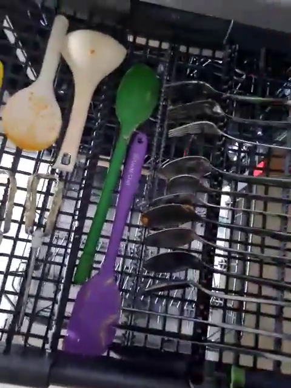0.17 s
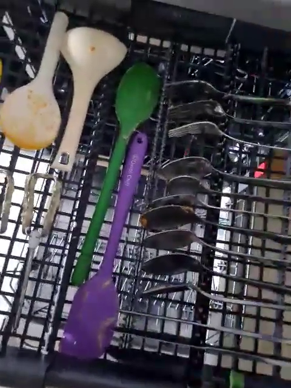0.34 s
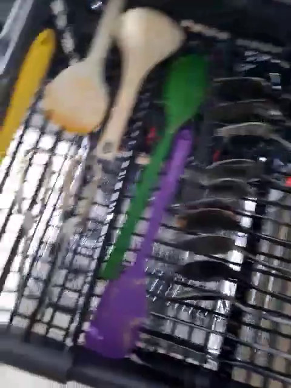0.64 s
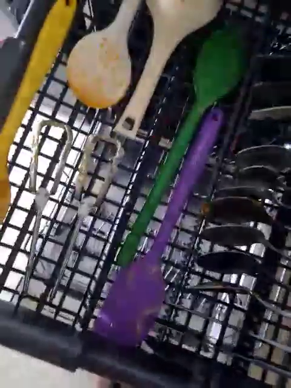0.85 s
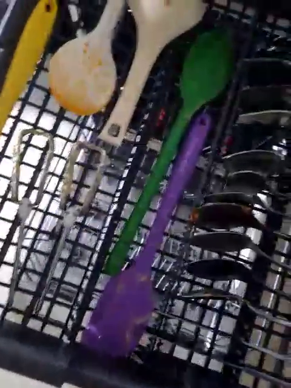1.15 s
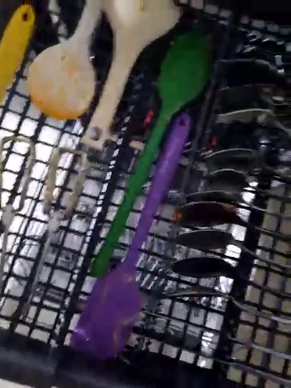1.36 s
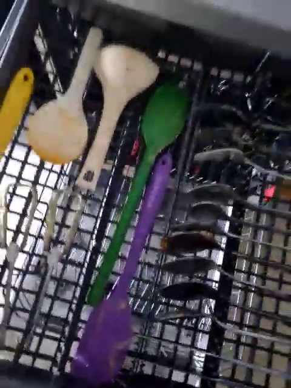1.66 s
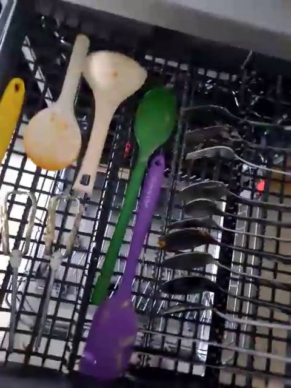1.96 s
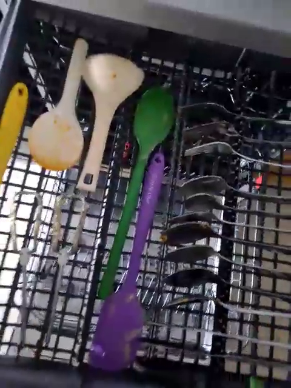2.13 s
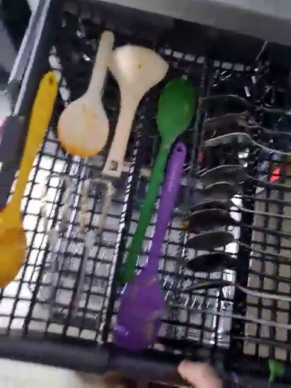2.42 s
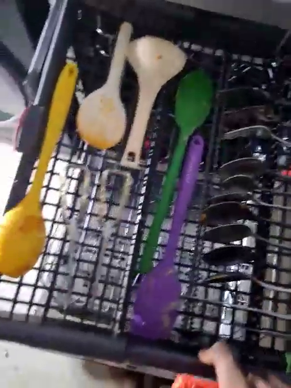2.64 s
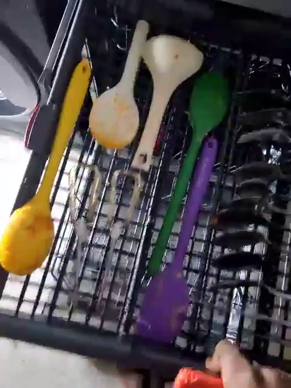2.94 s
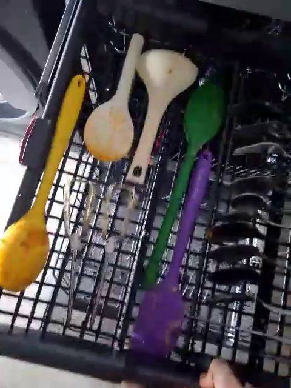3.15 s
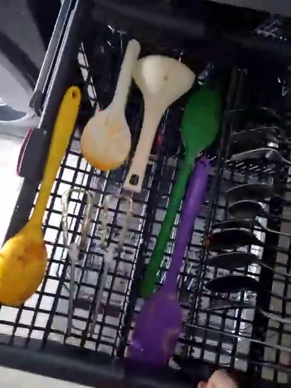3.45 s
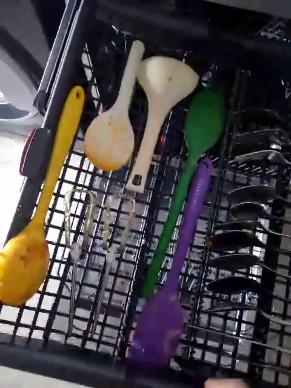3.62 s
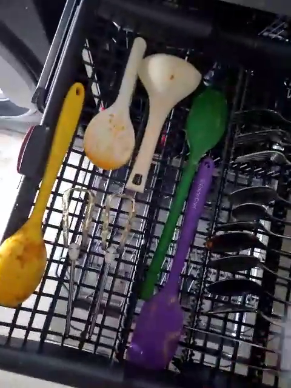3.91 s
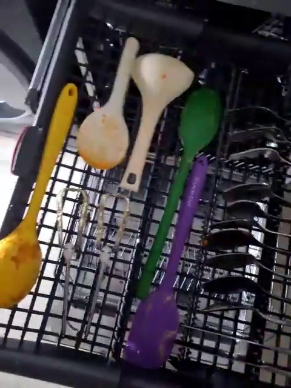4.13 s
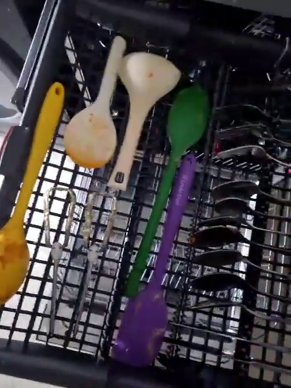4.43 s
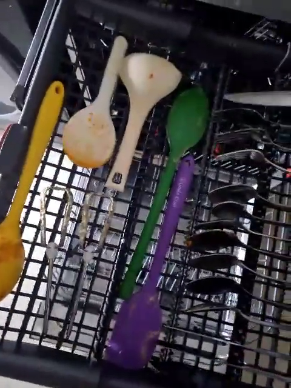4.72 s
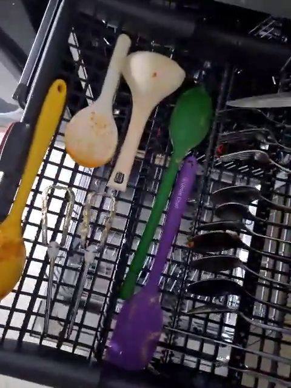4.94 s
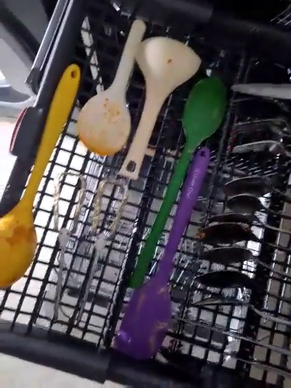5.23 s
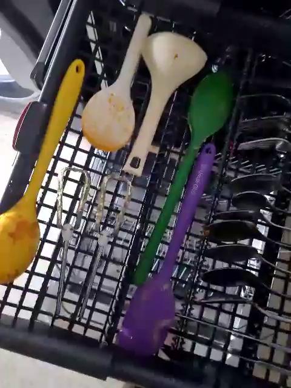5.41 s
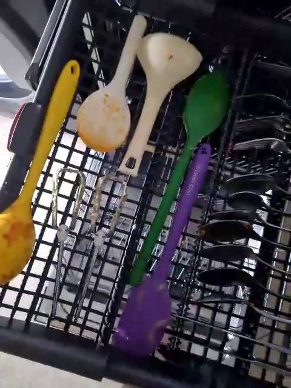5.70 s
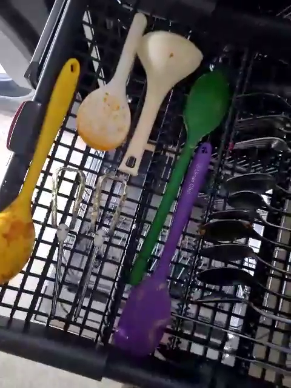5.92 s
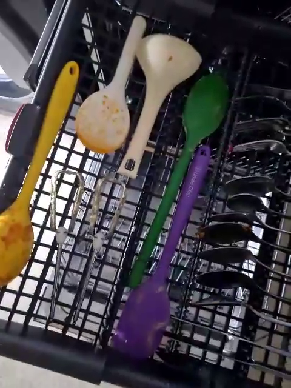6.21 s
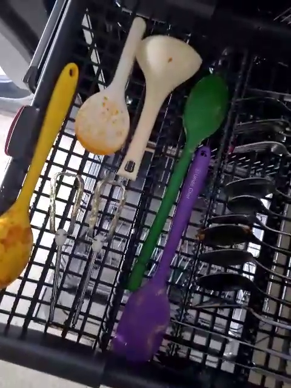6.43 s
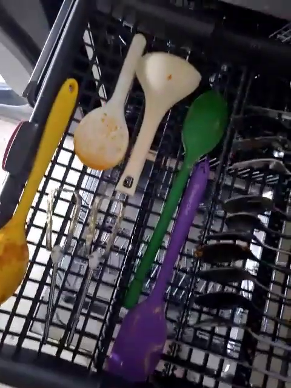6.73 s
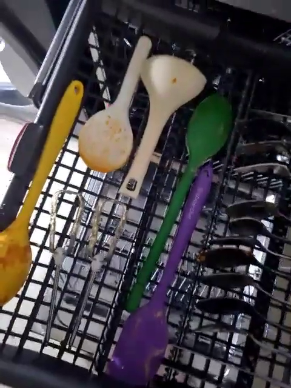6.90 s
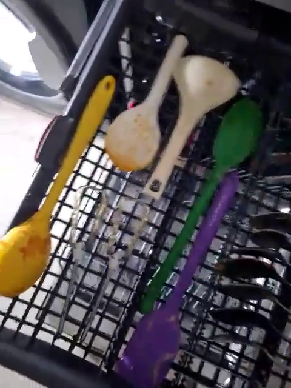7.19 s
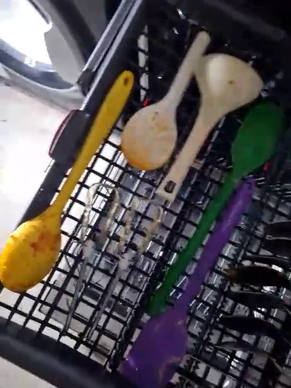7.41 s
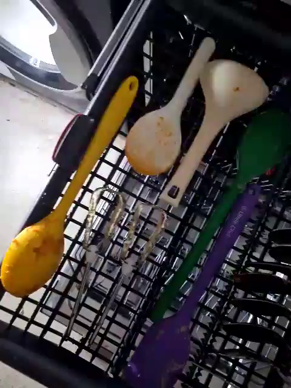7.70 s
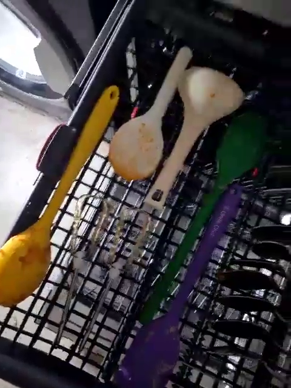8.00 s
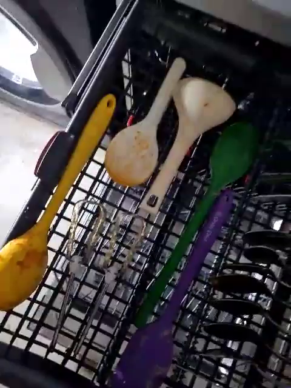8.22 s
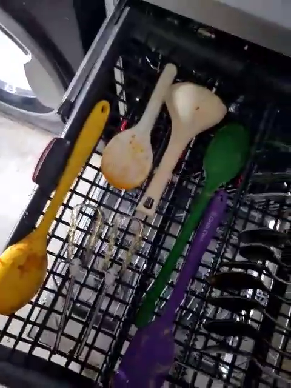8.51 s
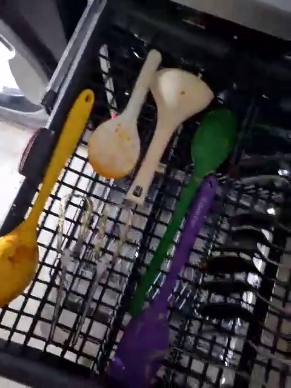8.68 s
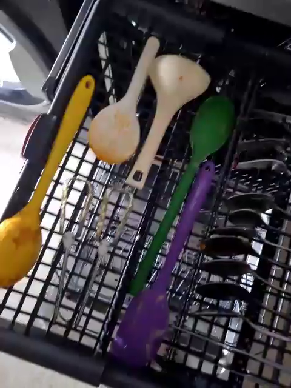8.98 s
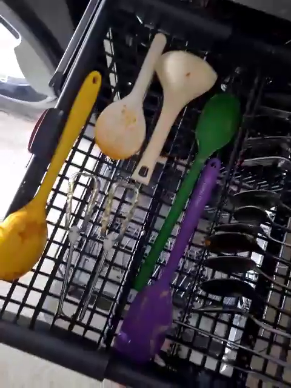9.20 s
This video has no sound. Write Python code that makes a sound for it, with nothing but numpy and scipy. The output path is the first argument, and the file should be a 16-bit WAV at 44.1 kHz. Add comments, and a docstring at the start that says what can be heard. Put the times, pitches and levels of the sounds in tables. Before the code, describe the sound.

A soft appliance drone with a low hum runs throughout, a little stronger at first. From the start, a dishwasher's plastic cutlery tray rolls on its rails, bumps at about 0.4 seconds and comes to rest before 1 second. A quick cluster of knocks and rattles follows around 1 second as cutlery meets the plastic grid, then a few faint ticks. A firm double knock lands at 3.3 seconds. From 4.4 to 6 seconds comes a string of dull knocks and short rattles, with a thin, high ring from a steel blade near 4.9 seconds. Hands rustle faintly in between. After a lull, the busiest clatter runs from 7.4 to 7.9 seconds, with a spoon chiming brightly twice inside it. A few light taps between 8.9 and 9.3 seconds end the scene. Everything sounds close, and the kitchen adds a short echo to each blow.

```python
"""Over a soft appliance drone, the plastic cutlery tray of an open dishwasher rolls out on its rails
and comes to rest within a second. Spoons and knives are then laid into its grid: dull knocks and
short rattles, with hands rustling in between. Near 5 s one steel blade rings; near 7.5 s a spoon
chimes in a burst of clatter, and a few light taps end the scene. The kitchen answers each blow."""
import sys
import numpy as np
from scipy import signal
from scipy.io import wavfile

SR = 44100
rng = np.random.default_rng(int(sys.argv[2]) if len(sys.argv) > 2 else 0)


def bounce(signal):
    """Save signal as a 16-bit WAV file at the path given by the first command-line argument."""
    frames = np.transpose(np.atleast_2d(signal))
    limited = np.clip(frames, -1, 1)
    pcm = np.round(limited * 32767).astype(np.int16)
    wavfile.write(sys.argv[1], SR, pcm)


N = 412335

# swell of the appliance drone: t/s, level/dB
DRONE_LEVEL = [(0, -55), (.6, -62.5), (1.5, -63.5), (2.0, -68.5), (2.5, -71.5), (3.1, -67), (3.7, -73),
               (4.2, -76.5), (4.8, -72), (5.6, -74), (6.3, -78), (6.9, -77), (7.1, -72.5), (8.2, -79.5),
               (8.8, -78), (9.35, -70)]
# noise colours of rumble, drone, rustle (also the hiss) and wheels: f/Hz, density/dB
RUMBLE_COLOUR = [(12, -62), (20, -44.5), (42, -11), (64, -2.5), (101, -9), (133, -13.5), (162, -12.5),
                 (270, -12), (359, -20), (600, -25.5), (780, -54), (1320, -120)]
DRONE_COLOUR = [(300, -22), (470, -7), (650, -1.5), (900, 4), (1400, -1.5), (1900, 0.5), (2300, -31),
                (2800, -20)]
RUSTLE_COLOUR = [(1290, -31.5), (2200, -17), (2550, -9.5), (2900, 4), (3890, 1), (4870, -0.5), (6630, -2.5),
                 (12500, -9.5), (15000, -14.5)]
WHEEL_COLOUR = [(30, -52.5), (60, -15), (90, -14.5), (280, -12.5), (640, -15.5), (1000, -18), (2000, -22.5),
                (3300, -19.5), (5000, -27), (12000, -60)]
# resonances of the cabinet, the rails and the plastic tray: f/Hz, width/Hz, gain/dB
CABINET_MODES = [(1430, 430, 0), (3450, 60, 7), (4500, 83, -4)]
RAIL_MODES = [(92, 15, 10), (280, 18, 17), (490, 30, 8), (641, 16, 16), (1290, 80, 9), (1670, 60, 6),
              (2220, 25, 13), (2620, 60, 8), (3290, 60, 6)]
TRAY_MODES = [(288.4, 24, -1), (469, 21, -5.5), (660, 36, -19), (1009, 17, -8), (1494, 130, -9.5),
              (3287, 540, 0), (4650, 800, -10.5)]
# moves of hands and cloth: start/s, end/s, level/dB
HAND_MOVES = [(0.676, 0.888, -68), (2.878, 3.19, -68.5), (3.6, 3.677, -75), (4.704, 4.897, -70),
              (5.658, 5.74, -83), (7.135, 7.437, -69), (9.24, 9.411, -76.5)]
# decay of the kitchen: f/Hz, t60/s
KITCHEN_DECAY = [(80, 1), (260, .5), (700, 0.43), (1840, 0.33), (4850, 0.44), (12800, 0.37)]
# the tray's run along its rails: t/s, level/dB
ROLL_LEVEL = [(0.0, -45), (0.196, -44.5), (0.376, -46), (0.438, -43.5), (0.588, -56.5), (0.85, -66.5)]
# partials of the steel knife and spoon: f/Hz, level/dB, t60/s
BLADE_MODES = [(2304, -6, .12), (3117, -20, .3), (4200, -8, .06), (5927, -7, .18), (8134, -10, .14),
               (9227, -12, .35), (9582, 0, .1), (10890, -20, 2.8), (11160, -2, .1), (11740, -12, .4),
               (12270, -10, .25), (12510, -1, .12)]
SPOON_MODES = [(7250, -2, .08), (8300, -5, .06), (9000, -5, .07), (9800, -1, .07), (10600, -6, .14),
               (11400, 0, .09), (12000, -4, .07)]
# hits that set them ringing: t/s, level/dB
BLADE_HITS = [(4.906, -36.5), (5.096, -65)]
SPOON_HITS = [(7.543, -37), (7.677, -37)]
# blows on the tray: t/s, snap of the first contact/dB, knock/dB, weight of the lows/dB,
# hardness of the highs/dB, rattle t60/s, the piece's own note f/Hz, note gain/dB
TRAY_BLOWS = [(0.432, -5, -56.5, 15.5, -12, 0.047, 236, -1), (0.887, -12, -37.5, -1, -22, .041, 1138, 11),
              (1.018, -12, -45, -10, -16, .084, 1270, 19.5), (1.033, 2.5, -22, -17, -22, .093, 3550, -1),
              (1.059, -4, -36, -9, -10.5, .22, 1540, 14), (1.1, -3, -35, -9.5, -12.5, .23, 3570, 1),
              (1.15, -20, -32, -8, -12.5, .22, 1725, 8.5), (1.678, -1, -73, -3, 17.5, .038, 4900, -4),
              (2.101, 1.5, -64, 3, -10, .15, 1770, 8.5), (2.672, 7, -67.5, -19, -37, .055, 1800, 14),
              (3.263, -12.5, -24, -4, -1, .1, 203.4, 3), (3.29, 5.5, -27.5, -23.5, 5, .056, 4170, 1),
              (4.433, -5.5, -60.5, -2.5, 17.5, .05, 290, 10.5), (4.44, 2, -48.5, 5, 6, .06, 1840, 4.2),
              (4.565, -7.5, -38, -16, -17.5, .032, 1970, 3.3), (4.579, 8.5, -20, -20.5, 1, .02, 285.6, 12),
              (4.775, -11, -63.5, 15.5, -15.5, .1, 284, 6), (4.89, 5.5, -47, -1, -7, .013, 2000, 9),
              (4.907, 11, -36.5, -10.5, 13.5, .044, 2100, -8.5), (5.095, 13, -60, -23, 11, .04, 1590, -1),
              (5.125, -3, -43.5, -17, -25, .071, 288, 14.5), (5.152, 2, -54.5, 0, -4, .081, 1934, 11),
              (5.222, 2, -52.5, 3, 1, .062, 1670, 2.5), (5.345, 0, -59, 6, -10, .094, 297, 9),
              (5.693, -4, -71.5, -14, 15, .047, 1910, 4.5), (5.931, 2, -37, -6, -1.8, .054, 1845, 8.5),
              (5.951, 3.5, -35, -10, -18, .03, 291, 10), (7.0, -3, -70.5, 18.5, -18, .11, 870, -8.5),
              (7.427, -4.5, -47.5, -5, -8.5, .044, 1408, 3),
              (7.436, -9, -30.5, -16.5, -28, .077, 1400, 2.5), (7.454, 7, -15, -22, -17, .1, 1337, 0),
              (7.508, -4, -14, -27.5, -28.5, .029, 1460, -3.5),
              (7.543, -5, -37, -20.5, 18.5, .081, 4450, -16), (7.627, 7, -8.5, -25, -10, .059, 1470, 5),
              (7.648, 11, -13, -15.5, -10.5, .068, 1470, -10),
              (7.677, 3.5, -18, -12.5, -2, .094, 3376, 10.5), (7.731, 11, -15.5, -24, -10, .053, 1618, -4),
              (7.748, 5, -18, -18.5, -11, .069, 1370, -1), (7.813, 9, -25.5, -11.5, -13, .045, 1374, 5.5),
              (7.829, -1.5, -14.5, -26, -15.5, .032, 1430, -20),
              (8.9, -10, -33.5, -0.5, 1, .021, 1835, 8.5), (9.017, 11.5, -56.5, -3, -6, .054, 3360, 7),
              (9.17, 0, -57.5, -6.5, -17, .12, 1764, 2.5), (9.311, -.6, -65.5, -21, -15, .055, 3260, 12)]
# six bands of contact noise: low/Hz, high/Hz
CONTACT_BANDS = [(50, 180), (180, 450), (450, 1000), (1000, 2500), (2500, 6000), (6000, 14500)]
# each band's answer to a blow: offset from the knock/dB, share of weight, share of hardness
BAND_RESPONSE = [(0, 1.465, 0.026), (0.6, 1.08, 0.066), (0.34, 0.42, 0), (0.5, 0.049, 0.068),
                 (-1, 0.08, 0.51), (2.5, 0.13, 0.98)]


def from_db(db):
    return 10 ** (np.asarray(db) / 20)


def unit_rms(x):
    return x / np.sqrt(np.mean(x ** 2) + 1e-20)


def envelope(points):
    return np.interp(np.arange(N) / SR, *np.transpose(points))


def at_hz(points, hz):
    freqs, values = np.transpose(points)
    return np.interp(np.log(hz), np.log(freqs), values)


def band(x, low, high, order=2):
    return signal.sosfilt(signal.butter(order, [low, high], "band", fs=SR, output="sos"), x)


def drift(rate_hz):
    """Random wander of spread 1: noise at every 40th sample through a double one-pole low-pass."""
    r = np.exp(-80 * np.pi * rate_hz / SR)
    slow = signal.lfilter([1], [1, -2 * r, r * r], rng.standard_normal(N // 40 + 2002))[2000:]
    return np.interp(np.arange(N) / 40, np.arange(len(slow)), unit_rms(slow))


def resonate(x, hz, width_hz):
    """One resonance, gain 1 at its peak."""
    r = np.exp(-np.pi * width_hz / SR)
    feedback = [1, -2 * r * np.cos(2 * np.pi * hz / SR), r * r]
    return signal.lfilter(np.array([1, 0, -1]) * (1 - r * r) / 2, feedback, x)


def body(x, modes, boost_db):
    """The sound itself plus its resonances in parallel, signs alternating."""
    return x + sum((-1) ** k * from_db(db + boost_db) * resonate(x, hz, width)
                   for k, (hz, width, db) in enumerate(modes))


def coloured_noise(colour, flicker_db):
    """Third-octave bands of noise, each flickering on its own; rms 1."""
    white = rng.standard_normal((2, N))
    edges = 20 * 2 ** np.arange(0, 9.7, 1 / 3)
    out = 0
    for k, (low, high) in enumerate(zip(edges, edges[1:])):
        centre = np.sqrt(low * high)
        if colour[0][0] < centre < colour[-1][0]:
            gain = from_db(at_hz(colour, centre) + flicker_db * drift(3.1))
            out = out + gain * band(white[k % 2], low, high)
    return unit_rms(out)


def appliance(hum_hz=63.4, hum_width_hz=15):
    """The bed: a wavering hum, low rumble, and a mid drone and faint hiss coloured by the cabinet."""
    drone_db = envelope(DRONE_LEVEL)
    swing_db = drone_db + 70   # rumble and hiss partly ride the drone's swell
    hum = resonate(rng.standard_normal(N), hum_hz, hum_width_hz)
    hum = from_db(-65.5) * unit_rms(resonate(hum, hum_hz, hum_width_hz))
    rumble = from_db(-65 + .4 * swing_db) * coloured_noise(RUMBLE_COLOUR, flicker_db=-2.9)
    drone = from_db(drone_db) * coloured_noise(DRONE_COLOUR, flicker_db=1.8)
    hiss = from_db(-79.5 + .52 * swing_db) * coloured_noise(RUSTLE_COLOUR, flicker_db=.3)
    return hum + rumble + body(drone + hiss, CABINET_MODES, boost_db=2.5)


def hands():
    """Hands and cloth brush by in short arches of bright noise."""
    t = np.arange(N) / SR
    swells = np.zeros(N)
    for start, end, db in HAND_MOVES:
        progress = np.clip((t - start) / (end - start), 0, 1)
        swells += from_db(db) * np.sqrt(np.sin(np.pi * progress).clip(0))
    return swells * coloured_noise(RUSTLE_COLOUR, flicker_db=.3)


def kitchen(x, wall_cutoff_hz=6103, build_s=.0013):
    """Room reverb: a noise tail that swells over the first reflections and dies band by band."""
    t = np.arange(round(.9 * SR)) / SR
    edges = 40 * 2 ** np.arange(0, 9, .5)
    tail = np.zeros(len(t))
    for low, high in zip(edges, edges[1:]):
        t60 = at_hz(KITCHEN_DECAY, np.sqrt(low * high))
        tail += band(rng.standard_normal(len(t)), low, high) * from_db(-60 * t / t60)
    tail = signal.lfilter(*signal.butter(1, wall_cutoff_hz, fs=SR), tail)   # walls return less treble
    tail *= 1 - np.exp(-t / build_s)
    return signal.fftconvolve(x, tail / np.sqrt(np.sum(tail ** 2)))[:N]


def rollers(edge_hz=2960):
    """Small wheels run along the rails: lumpy noise in the frame's resonances, weak above an edge."""
    judder = coloured_noise(WHEEL_COLOUR, flicker_db=1) * from_db(1.2 * drift(60))
    dark = signal.sosfilt(signal.butter(8, edge_hz, fs=SR, output="sos"), judder)
    rolling = body(dark + from_db(-10) * judder, RAIL_MODES, boost_db=0)
    fade_out = [(ROLL_LEVEL[-1][0] + .22, -100)]
    return from_db(envelope(ROLL_LEVEL + fade_out)) * unit_rms(rolling)


def steel(modes, hits, damped_at_s):
    """Struck steel rings in inharmonic modes, unevenly each time, until something lands on it."""
    out = np.zeros(N)
    for start, hit_db in hits:
        age = np.arange(round((damped_at_s + .05 - start) * SR)) / SR
        scatter_db = rng.normal(0, 1.5, len(modes))
        ring = sum(from_db(db + scatter - 60 * age / t60) * np.sin(2 * np.pi * hz * age)
                   for (hz, db, t60), scatter in zip(modes, scatter_db))
        damping = from_db(-2000 * np.maximum(age + start - damped_at_s, 0))
        out[round(start * SR):][:len(age)] += from_db(hit_db) * ring * damping
    return out


def rattle(t, t60, grains_per_s=6000, build_s=.00087):
    """A patter of tiny, uneven contacts that builds up fast and dies away."""
    chance, size, polarity = rng.random((3, len(t)))
    size_db = 2.5 * np.minimum(-np.log(1 - size), 3)
    grains = (chance < grains_per_s / SR) * from_db(size_db) * np.sign(polarity - .5)
    return grains * from_db(-60 * t / t60) * (1 - np.exp(-t / build_s))


def tray(plastic_cutoff_hz=8800):
    """Each blow is a snap and a rattle that excite the plastic tray and the piece's own note."""
    t = np.arange(round(.3 * SR)) / SR
    widths = np.diff(CONTACT_BANDS)[:, 0] / (SR / 2)
    clicks, notes = np.zeros((len(widths), N + len(t))), np.zeros(N + len(t))
    offset_db, weight_share, hard_share = np.transpose(BAND_RESPONSE)
    for start, snap_db, knock_db, weight_db, hard_db, t60, note_hz, note_db in TRAY_BLOWS:
        at = round(start * SR)
        band_db = knock_db + offset_db + weight_share * weight_db + hard_share * hard_db
        grains = rattle(t, t60)
        clicks[:, at:at + len(t)] += np.outer(from_db(band_db) / np.sqrt(widths), grains)
        clicks[:, at] += from_db(snap_db - 9.5 + band_db) / widths   # the snap has the rattle's colour
        grains[0] = 12   # the first contact kicks the note
        note = resonate(grains, note_hz, width_hz=min(150, .075 * note_hz))
        notes[at:at + len(t)] += from_db(max(band_db) + note_db + 13) * note
    contact = sum(band(row + 1e-18, low, high, order=3)
                  for (low, high), row in zip(CONTACT_BANDS, clicks[:, :N]))
    # plastic yields, so the very top is soft
    contact = signal.lfilter(*signal.butter(2, plastic_cutoff_hz, fs=SR), contact)
    return body(contact, TRAY_MODES, boost_db=13.5) + notes[:N]


def scene(reverb_db=-4):
    """Mono mix: blows and ringing steel feed the room; wheels, bed and hands get no reverb."""
    struck = tray()
    struck += steel(BLADE_MODES, BLADE_HITS, damped_at_s=5.93)
    struck += steel(SPOON_MODES, SPOON_HITS, damped_at_s=7.95)
    return (struck + from_db(reverb_db) * kitchen(struck) + rollers() + appliance() + hands())[None]


def record(dry, cutoff_hz=14250):
    """Soft clipping rounds the highest peaks; a steep low-pass cuts the top."""
    rounded = .9 * np.tanh(dry / .9)
    return signal.sosfilt(signal.cheby2(14, 60, cutoff_hz, fs=SR, output="sos"), rounded)


dry = scene()
out = record(dry)
bounce(out)
```